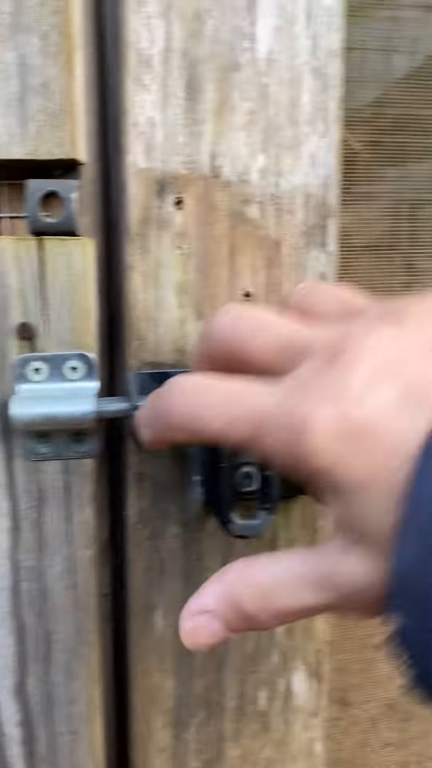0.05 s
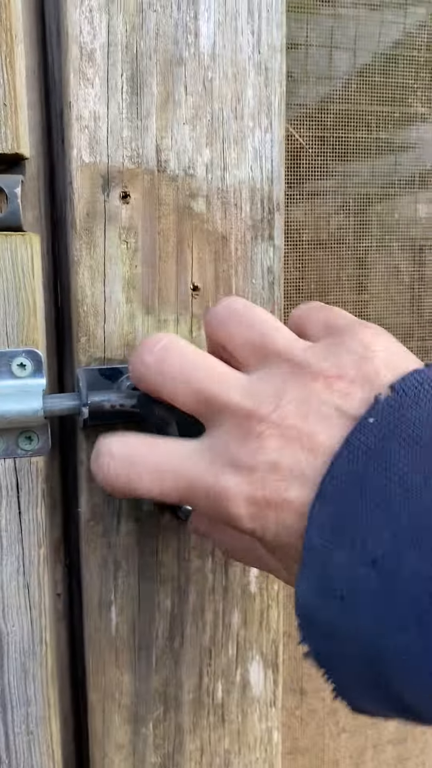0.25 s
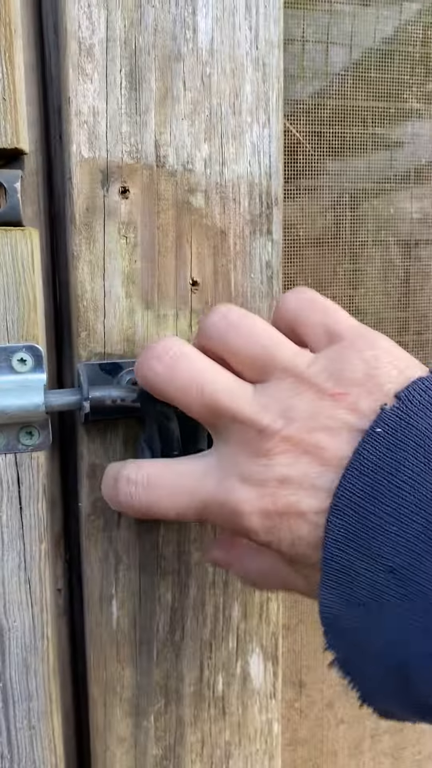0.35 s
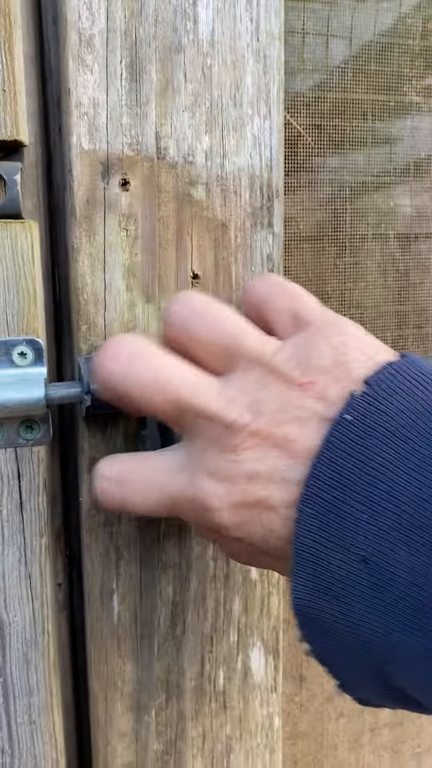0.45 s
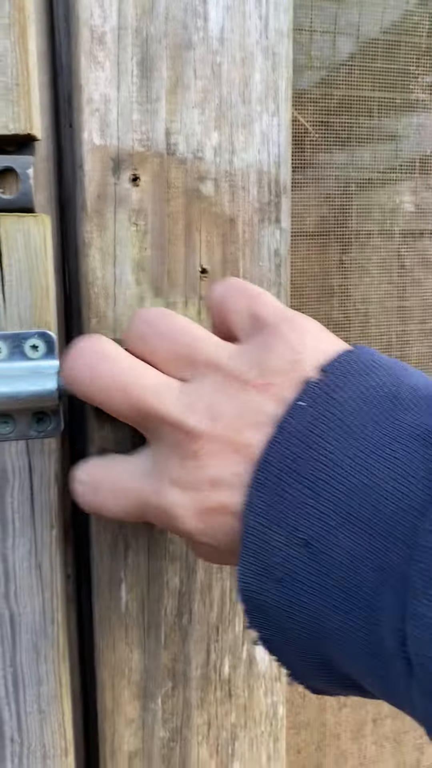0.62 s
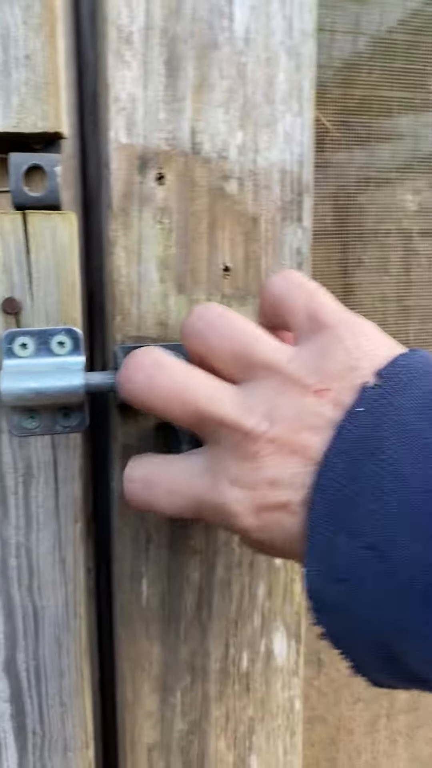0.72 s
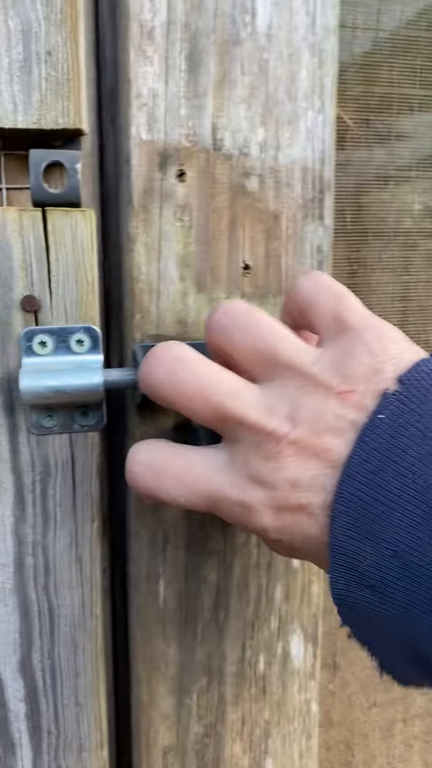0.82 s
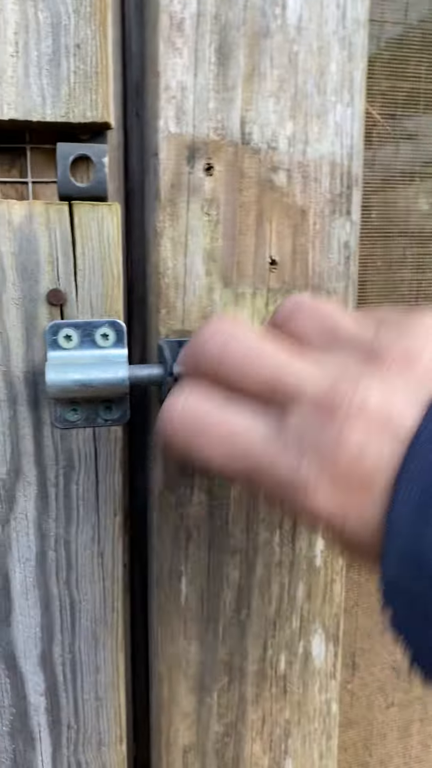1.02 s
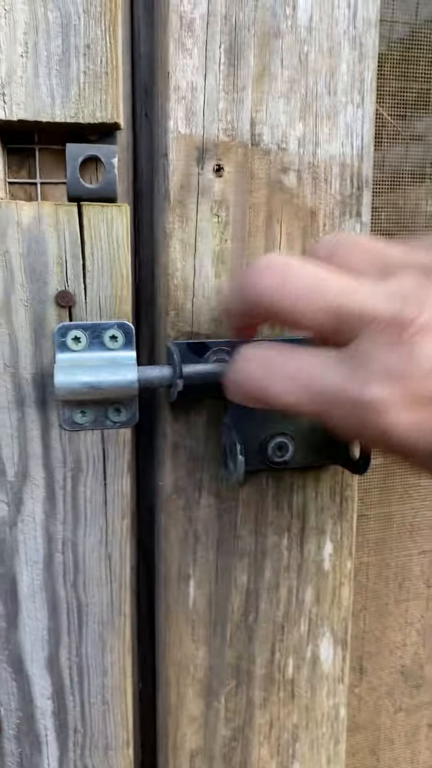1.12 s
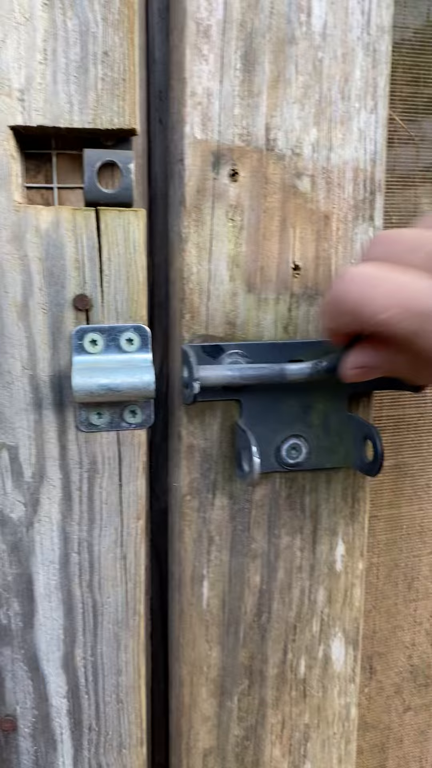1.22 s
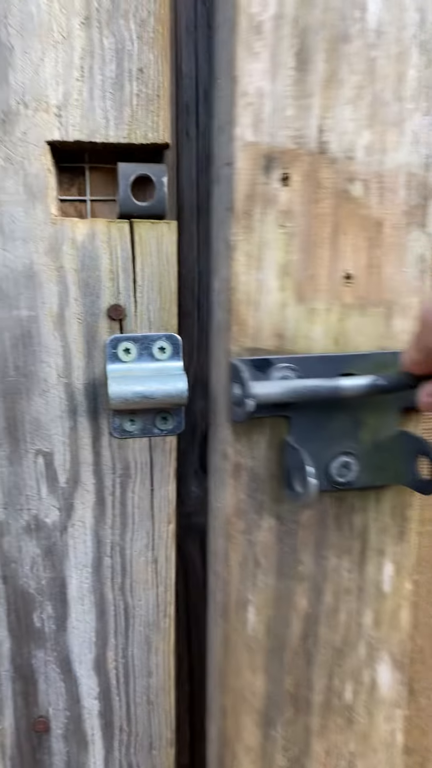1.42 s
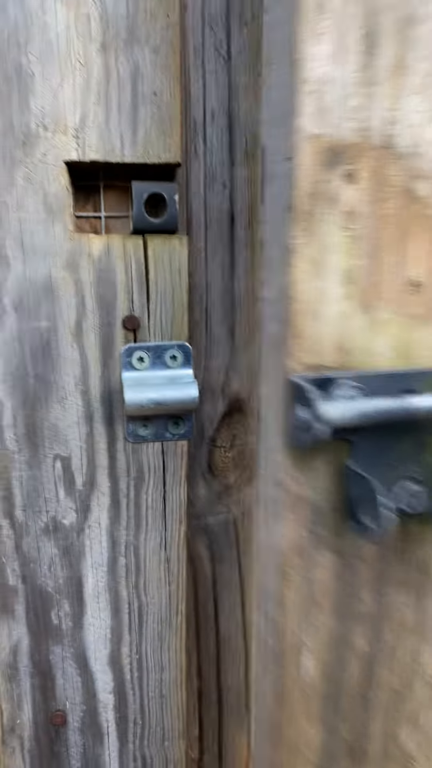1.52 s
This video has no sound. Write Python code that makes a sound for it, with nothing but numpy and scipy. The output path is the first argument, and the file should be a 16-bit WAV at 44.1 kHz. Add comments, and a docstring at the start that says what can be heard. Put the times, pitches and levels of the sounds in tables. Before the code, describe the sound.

A metal bolt latch on a wooden door: one hard clack with a clink, a quiet pause with faint sleeve rustle, then rattling knocks, scrapes, a brief squeak and a last clink, close up outdoors.

```python
"""A steel barrel bolt on a wooden garden door is worked open by hand, close by, outdoors.
A scrape (random slips ringing the plate), then a hard knock (damped modes, noise crack, snap) and a clink.
A soft door bump (damped sine) and sleeve swishes (grainy noise) follow, then a run of scrapes and rattling blows.
A brief squeak (wavering sine, pulsed rasp), more door bumps, last knocks and a clink against the stop.
A low outdoor rumble (filtered noise) lies under it all; the yard adds a weak noise tail."""
import sys
import numpy as np
from scipy import signal
from scipy.fft import rfft, irfft, next_fast_len
from scipy.io import wavfile
from scipy.ndimage import uniform_filter1d

SR = 44100
rng = np.random.default_rng(int(sys.argv[2]) if len(sys.argv) > 2 else 0)


def wrap_up_sound(samples):
    """Save the sound to the file named by the first command line argument, as 16-bit audio."""
    columns = np.atleast_2d(samples).T
    # keep every value between -1 and 1, then stretch to whole-number steps
    tamed = np.clip(columns, -1, 1)
    steps = np.round(tamed * 32767).astype(np.int16)
    wavfile.write(sys.argv[1], SR, steps)


N = 68355

# Bolt on plate and boards: (time [s], level [dB], bass [dB], 2 kHz [dB], 4 kHz [dB], top [dB])
KNOCK_EVENTS = [(.2160, -8, -4, -2, -4.5, -16), (0.2217, -14.5, -5.5, -6, -3.5, -36),
                (0.6161, -30.5, -14.5, -4.5, -6, -39), (0.6454, -37.5, 2, 2.5, -4, -28),
                (0.724, -9.5, -8, -5, -8, -19), (0.7325, -17.5, 5.5, -8, -7, -26),
                (0.7465, -23.5, 3.5, 3.5, 3, -14), (0.7527, -25, 0.5, 4, 4, -8),
                (.8550, -27, -9, -5.5, -6, -22.5), (0.8599, -16.5, 2.5, -1, 0.5, -9.5),
                (1.036, -25, -11.5, 2, -3.5, -20.5), (1.1246, -24.5, 6.5, 0, -7, -25),
                (1.144, -31, 6, 1, -9.5, -33), (1.162, -39.5, 17, -3, -5.5, -26),
                (1.221, -29.5, 2.5, -1, -16.5, -20), (1.2446, -29.5, 12.5, -7.5, 2, -2),
                (1.2575, -29, 9, -1, 2, -0.5), (1.3904, -48.5, 5, 4.5, -11, -14)]
# Modes of the plate screwed to the boards: (frequency [Hz], level [dB], t60 [s])
PLATE_MODES = [(246, -21.5, 0.045), (337.2, -11, 0.05), (553.5, -11, 0.053), (749, -8, 0.041),
               (1115, 3, 0.032), (1303, -2, 0.036), (1416, -4.5, 0.038), (1733, -5, 0.029),
               (1922, -3, 0.034), (2207, -11, 0.064), (2676, -3.5, 0.028), (3437, -10.5, 0.039)]
# Dense modes of wood and fittings, spectrum: (frequency [Hz], gain [dB])
CRACK_COLOUR = [(170, 1.5), (450, 3.5), (900, -3), (1300, 2.5), (2500, 2.5), (4500, -1), (7300, -6),
                (9500, -5), (11800, -23), (15000, -10.5)]
# Dense modes of wood and fittings, damping: (frequency [Hz], t60 [s])
CRACK_DAMPING = [(150, 0.075), (1000, 0.033), (4000, 0.027), (12000, 0.0083)]
# Instant of contact, spectrum: (frequency [Hz], gain [dB])
SNAP_COLOUR = [(500, -26), (4000, 6.5), (14000, -0.5)]
# Light steel contacts: (time [s], level [dB], low edge [Hz], high edge [Hz], t60 [s])
TICK_EVENTS = [(.2095, -37, 2000, 2800, .06), (.6366, -37, 1910, 3840, 0.02),
               (0.7318, -14.5, 2200, 6900, 0.01), (0.7462, -14.5, 2190, 11800, 0.0054),
               (0.7522, -20.5, 2400, 7500, 0.013), (.759, -28, 2400, 8000, 0.012),
               (0.859, -15, 5190, 12400, 0.014), (1.036, -20, 1480, 5950, 0.0076),
               (1.228, -26.5, 5300, 11550, 0.019), (1.2548, -20.5, 5370, 14000, 0.015),
               (1.472, -60.5, 2000, 3940, 0.027)]
# Free modes of the steel: (frequency [Hz], level [dB], t60 [s])
STEEL_MODES = [(3660, -3, .07), (5864, 1, .21), (6961, -2.5, .22), (7160, 2, .035), (7650, 0, .28),
               (11455, -7, .11), (14420, -4, .2)]
# Steel clinks: (time [s], level [dB], favoured pitch [Hz], delay until pressed still [s])
CLINK_EVENTS = [(.2195, -28, 6600, .008), (.7325, -31, 7400, .02), (.7470, -23, 3700, .015),
                (.7595, -33, 7400, .034), (.768, -46, 5864, .036), (.8598, -27, 8200, .006),
                (1.2282, -24.5, 5750, .014)]
# Bolt sliding in the barrel: (start [s], peak [s], end [s], level [dB], treble [dB])
SCRAPE_STROKES = [(-.03, -0.002, 0.069, -35.5, 5), (0.63, 0.681, 0.715, -33.5, -6.5),
                  (0.684, 0.7, 0.75, -38, 1), (0.722, 0.74, 0.84, -31, -0.5),
                  (0.982, 1.01, 1.036, -42, 0.5), (1.02, 1.045, 1.088, -30.5, -1),
                  (1.052, 1.095, 1.14, -46, -5), (1.129, 1.206, 1.238, -46, 2.5),
                  (1.218, 1.232, 1.295, -28, -1)]
# Scrape spectrum: (frequency [Hz], gain [dB])
SCRAPE_SPECTRUM = [(100, -18), (500, -3), (730, 6), (900, -0.5), (2000, 0), (9000, -8), (12000, -16.5)]
# Soft bumps of the door: (time [s], level [dB], frequency [Hz], t60 [s])
BUMP_EVENTS = [(0.4238, -35.5, 367, 0.041), (.79, -44.5, 238, .15), (1.0754, -33.5, 104, 0.2),
               (1.077, -31.5, 144.6, 0.12), (1.076, -36, 316, 0.047), (1.241, -29, 150.6, 0.11),
               (1.244, -33.5, 323, 0.11)]
# Sleeve and fingers brushing: (time [s], width [s], level [dB])
BRUSH_STROKES = [(0.501, 0.022, -55), (.553, 0.011, -53.5), (0.595, 0.016, -54.5), (0.831, 0.04, -56)]
# Brushing noise spectrum, with a faint hiss at the very top: (frequency [Hz], gain [dB])
BRUSH_COLOUR = [(200, -4), (700, -7), (2000, 6.5), (4500, -10.5), (9000, -13.5), (12000, -27.5),
                (15000, -10.5)]
# Damping of the yard's scatter: (frequency [Hz], t60 [s])
YARD_DAMPING = [(1500, 0.24), (12000, 0.16)]
# Outdoor rumble and air, spectrum: (frequency [Hz], gain [dB])
OUTDOORS_COLOUR = [(20, -18.5), (48, -13), (78, 5), (110, -5), (350, -13.5), (600, -15.5), (2000, -24),
                   (4000, -32), (12000, -49.5), (15000, -42.5)]
# Outdoor rumble and air, course: (time [s], level [dB])
OUTDOORS_COURSE = [(0, -47), (.15, -54), (0.451, -59), (.82, -54), (0.999, -55.5), (1.349, -51),
                   (1.448, -62.5)]

RING_S, TOP_HZ = 0.3, 15900
PLATE_DB, CRACK_DB, SNAP_DB = -3.5, 6, -2
MODE_SCATTER_DB, BASS_CUT_DB = 0.5, -4
ATTACK_S, SNAP_S, TICK_ATTACK_S, BUMP_ATTACK_S = 0.00069, 0.0008, 0.00028, 0.0031  # time constants
FAVOUR_OCTAVES, OTHER_MODES_DB, GRIP_S = 0.21, -17, 0.003
SCRAPE_FADE_DB, SLIPS_PER_S, SLIP_SPREAD_DB = 26.5, 1400, 3
SQUEAK_S, SQUEAK_HZ, SQUEAK_DB = 1.034, 1114, -24
SQUEAK_RISE_S, SQUEAK_FALL_S = 0.011, 0.0094
SQUEAK_JITTER, RASP_DB = 0.007, -17  # rms fraction of pitch; rasp relative to tone
YARD_DB = -18


def amp(db):
    """Decibels to gain."""
    return 10 ** (np.asarray(db) / 20)


def unit(x):
    """Scale to rms 1."""
    return x / np.sqrt(np.mean(x ** 2) + 1e-20)


def along(points, hz):
    """Read (frequency [Hz], value) points on a log axis."""
    f, v = np.transpose(points)
    return np.interp(np.log(hz + 1), np.log(f + 1), v)


def colour(x, points):
    """Causal minimum-phase filter through (frequency [Hz], gain [dB]) points."""
    m = 2 * next_fast_len(len(x) // 2 + 4096)
    gain = amp(along(points, np.fft.rfftfreq(m, 1 / SR)))
    cepstrum = irfft(np.log(gain), m)
    # Folding the cepstrum forward makes the filter causal
    cepstrum[1:m // 2] *= 2
    cepstrum[m // 2 + 1:] = 0
    response = np.exp(rfft(cepstrum))
    return irfft(rfft(x, m) * response, m)[:len(x)]


def dying(x, t60s):
    """Fade each frequency of x at its own rate, as damping does."""
    hz, t, z = signal.stft(x, SR, nperseg=128)
    fade = amp(-60 * t / along(t60s, hz)[:, None])
    return signal.istft(z * fade, SR, nperseg=128)[1][:len(x)]


def even(x):
    """Level a burst's broad spectrum, keep its fine grain, silence its second half."""
    z = rfft(x)
    power = np.abs(uniform_filter1d(np.abs(z) ** 2, size=110))
    level = irfft(z * np.sqrt(power.mean() / power), len(x))
    return level * (np.arange(len(x)) < len(x) // 2)


def ring(modes, t):
    """Sum damped sines of alternating sign, levels scattered at every call."""
    out = np.zeros(len(t))
    for k, (hz, db, t60_s) in enumerate(modes):
        level_db = db + MODE_SCATTER_DB * rng.standard_normal()
        out += (-1) ** k * amp(level_db - 60 * t / t60_s) * np.sin(2 * np.pi * hz * t)
    return out


def ring_time():
    """Time axis of one contact [s]."""
    return np.arange(int(RING_S * SR)) / SR


def add(track, s, sound):
    """Mix a sound in at time s."""
    i = max(round(s * SR), 0)
    track[i:i + len(sound)] += sound[:N - i]


def blow():
    """One contact: the plate's modes, the crack of the boards and a brief bright snap."""
    t = ring_time()
    crack = colour(even(dying(rng.standard_normal(len(t)), CRACK_DAMPING)), CRACK_COLOUR)
    snap = unit(colour(rng.standard_normal(len(t)), SNAP_COLOUR)) * np.exp(-t / SNAP_S)
    mix = amp(PLATE_DB) * ring(PLATE_MODES, t) + amp(CRACK_DB) * crack + amp(SNAP_DB) * snap
    return mix * (1 - np.exp(-t / ATTACK_S))


def knocks():
    """Each knock is a blow with its own level, bass, middle and treble."""
    out = np.zeros(N)
    for s, db, bass, mid, presence, top in KNOCK_EVENTS:
        tone = [(60, bass + 2 * BASS_CUT_DB), (220, bass), (400, bass), (1000, 0),
                (2000, mid), (4000, presence), (10000, top)]
        add(out, s, amp(db) * colour(blow(), tone))
    return out


def ticks():
    """Light steel contacts: band noise with a quick attack and a short decay."""
    out, t = np.zeros(N), ring_time()
    for s, db, low_hz, high_hz, t60_s in TICK_EVENTS:
        band = signal.butter(2, [low_hz, min(high_hz, TOP_HZ)], "bandpass", fs=SR, output="sos")
        burst = unit(signal.sosfilt(band, rng.standard_normal(len(t))))
        add(out, s, burst * amp(db - 60 * t / t60_s) * (1 - np.exp(-t / TICK_ATTACK_S)))
    return out


def clinks():
    """The contact point favours some steel modes; they ring until the hand presses the bolt still."""
    out, t = np.zeros(N), ring_time()
    for s, db, favoured_hz, free_s in CLINK_EVENTS:
        modes = []
        for hz, level_db, t60_s in STEEL_MODES:
            distance = np.log2(hz / favoured_hz) / FAVOUR_OCTAVES
            modes.append((hz, level_db + OTHER_MODES_DB * (1 - np.exp(-distance ** 2)), t60_s))
        release = (1 - np.tanh((t - free_s) / GRIP_S / 2)) / 2
        add(out, s, amp(db) * ring(modes, t) * release)
    return out


def scrapes():
    """Tiny random slips ring the plate under each swelling stroke."""
    out, t = np.zeros(N), np.arange(N) / SR
    for start, peak, end, db, treble_db in SCRAPE_STROKES:
        slips = (rng.random(N) < SLIPS_PER_S / SR).astype(float)
        slips *= amp(SLIP_SPREAD_DB * rng.standard_normal(N))
        slips *= rng.choice([-1, 1], N)
        rub = unit(colour(signal.fftconvolve(slips, blow())[:N], SCRAPE_SPECTRUM))
        # 0 at the peak, 1 at start and end
        away = np.maximum((peak - t) / max(peak - start, 1e-3), (t - peak) / max(end - peak, 1e-3))
        out += amp(db - SCRAPE_FADE_DB * away) * colour(rub, [(1500, 0), (5000, treble_db)])
    return out


def squeak():
    """Stick-slip near a plate mode: a wavering tone, with a rasp once a cycle until it breaks free."""
    t = np.arange(N) / SR - SQUEAK_S
    waver = unit(uniform_filter1d(rng.standard_normal(N), size=150))
    tone = np.sin(2 * np.pi * np.cumsum(SQUEAK_HZ * (1 + SQUEAK_JITTER * waver)) / SR)
    pulses = rng.standard_normal(N) * np.maximum(tone, 0) ** 2
    rasp = unit(colour(pulses, CRACK_COLOUR)) * (t > -SQUEAK_RISE_S) * (t < 0)
    swell = np.exp(-(t / np.where(t < 0, SQUEAK_RISE_S, SQUEAK_FALL_S)) ** 2)
    return amp(SQUEAK_DB) * (swell * tone + amp(RASP_DB) * rasp)


def bumps():
    """The door's low, soft thuds as it comes free: damped sines with a slow attack."""
    out, t = np.zeros(N), ring_time()
    for s, db, hz, t60_s in BUMP_EVENTS:
        add(out, s, ring([(hz, db, t60_s)], t) * (1 - np.exp(-t / BUMP_ATTACK_S)))
    return out


def sleeve(grain_db=3):
    """Brushing sleeve and fingers: noise with a random grain, in Gaussian swishes."""
    t = np.arange(N) / SR
    grains = amp(grain_db * unit(uniform_filter1d(rng.standard_normal(N), size=90)))
    strokes = sum(amp(db) * np.exp(-((t - s) / width_s) ** 2) for s, width_s, db in BRUSH_STROKES)
    return strokes * unit(colour(grains * rng.standard_normal(N), BRUSH_COLOUR))


def yard(x):
    """Weak scatter from fence and ground: convolution with a decaying noise tail."""
    tail = dying(rng.standard_normal(SR // 2), YARD_DAMPING)
    return signal.fftconvolve(x, tail / np.linalg.norm(tail))[:N]


def outdoors():
    """Low rumble and faint air: coloured noise of drifting level."""
    level_db = np.interp(np.arange(N) / SR, *np.transpose(OUTDOORS_COURSE))
    # The first second, where the filter settles, is dropped
    noise = colour(rng.standard_normal(N + SR), OUTDOORS_COLOUR)[SR:]
    return amp(level_db) * unit(noise)


def scene():
    """The latch in its yard; the thin ring of the steel is heard only close by."""
    latch = knocks() + ticks() + bumps() + scrapes() + squeak()
    return (latch + clinks() + amp(YARD_DB) * yard(latch) + sleeve() + outdoors())[None]


def record(dry):
    """Steep low-pass at the band limit."""
    return signal.sosfilt(signal.ellip(12, 0.1, 90, TOP_HZ, fs=SR, output="sos"), dry)


dry = scene()
out = record(dry)
wrap_up_sound(out)
```